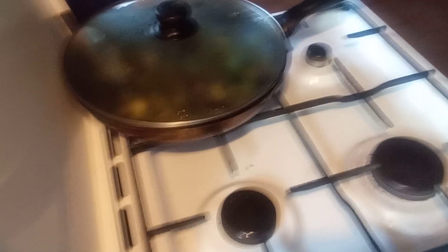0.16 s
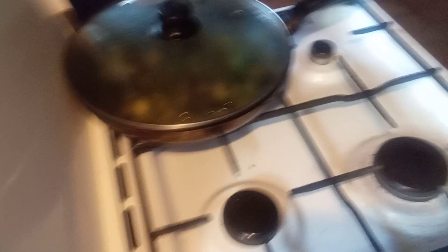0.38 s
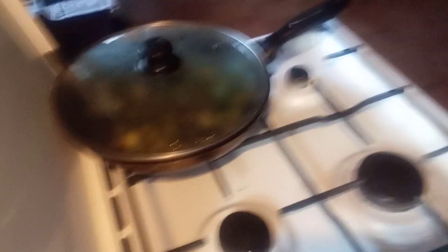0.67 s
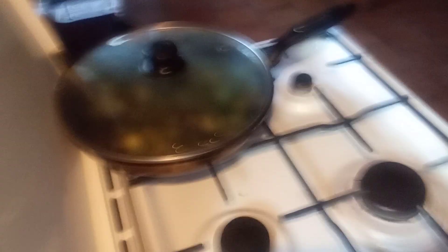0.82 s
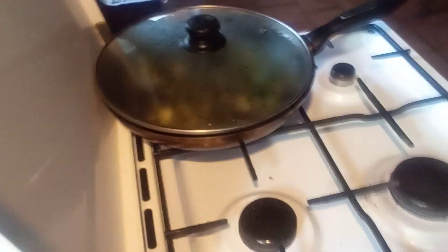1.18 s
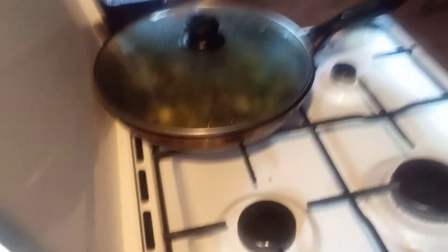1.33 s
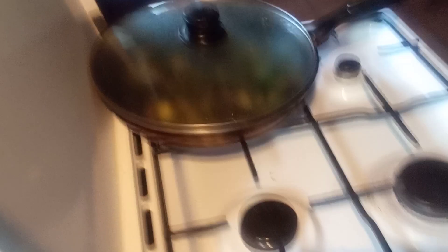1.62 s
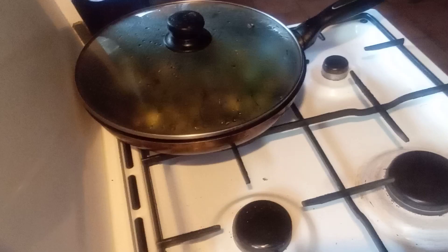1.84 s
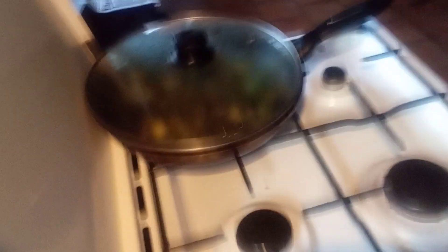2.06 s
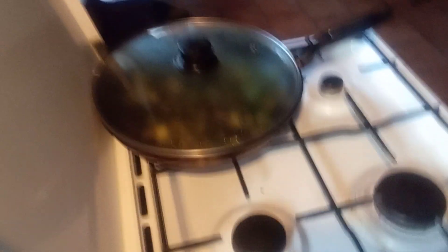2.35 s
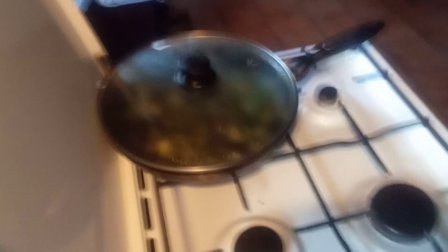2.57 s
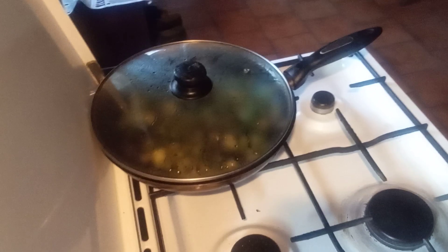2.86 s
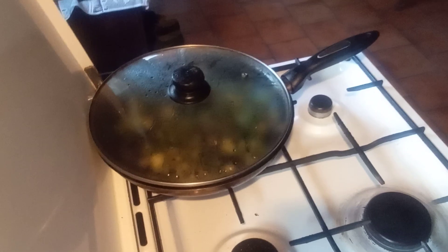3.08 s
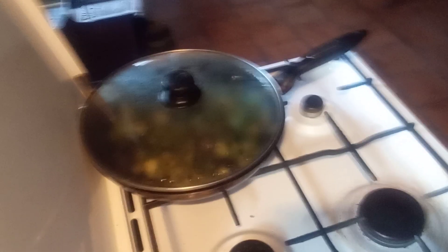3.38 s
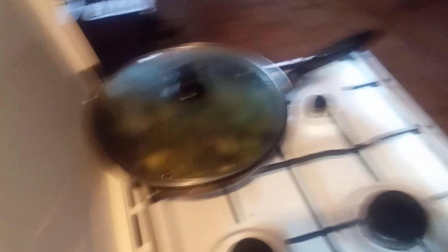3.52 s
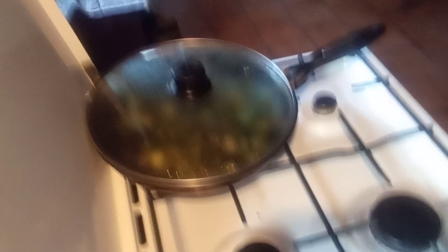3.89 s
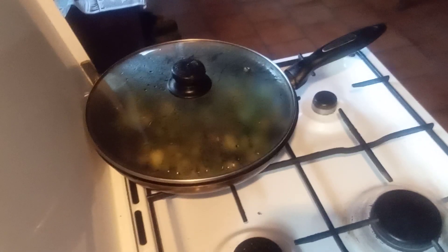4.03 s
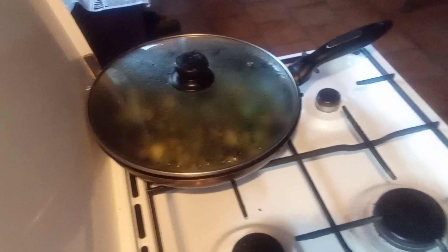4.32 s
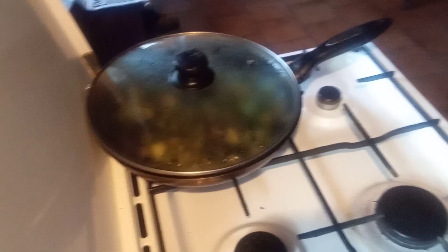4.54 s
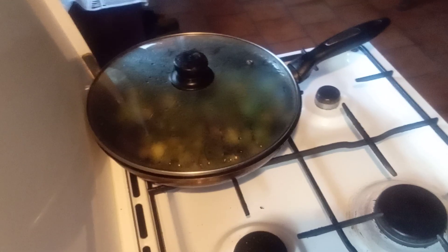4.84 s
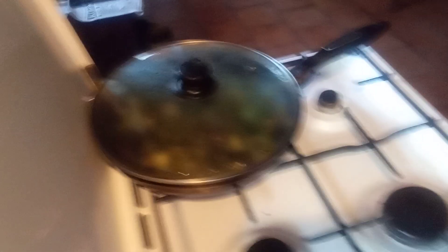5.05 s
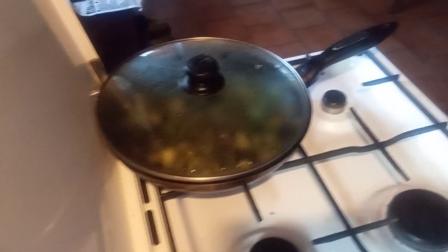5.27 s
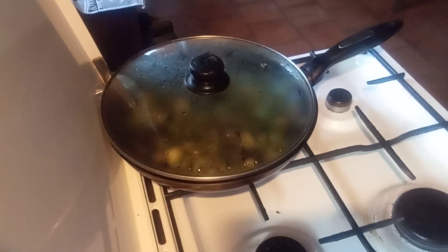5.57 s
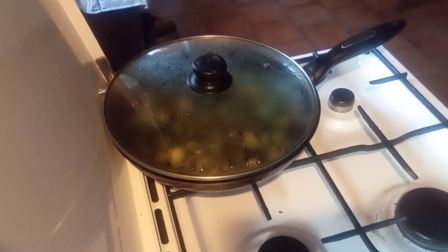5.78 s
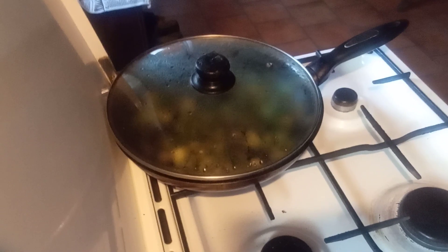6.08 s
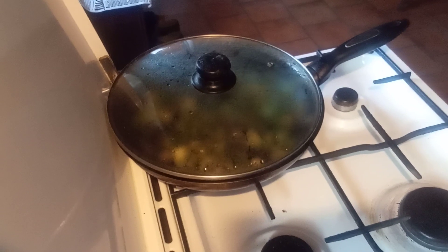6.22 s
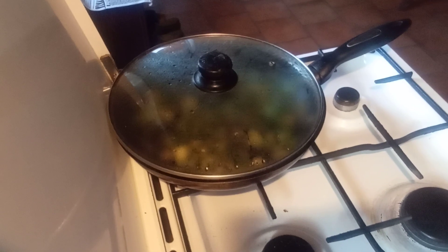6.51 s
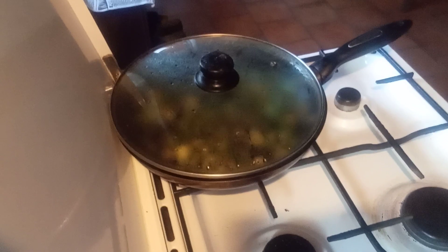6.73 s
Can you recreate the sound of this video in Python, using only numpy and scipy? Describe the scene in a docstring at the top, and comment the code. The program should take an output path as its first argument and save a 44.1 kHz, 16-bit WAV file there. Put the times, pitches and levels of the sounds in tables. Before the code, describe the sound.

A covered pan of greens in sauce fries quietly on a gas stove, heard close through a handheld phone. Fine, bright, uneven sizzle and softer hiss continue from start to end, over hollow low-level bubbling and a faint steady burner rush. From 0 to 1.1 s fingers rub and knock the phone case, with hard hollow taps around 0.4-0.5, 0.7 and 0.9. Small sauce plops come at 1.23 and 1.43. A heavy thud and sharp crack hit together at 1.62; another thump at 1.96, then scraping and a knock at 2.3-2.4. Handling softens into light rubs from 2.8 to 4.2, while bubbles pop and fat ticks. A crisp crack at 4.68 leads to a clicky tap at 4.83 and a palm brushing away past 5. Spits cluster around 5.85-6.2; faint dull bumps and rubbing return at 6.75.

```python
"""Fat sizzles and spits around greens in sauce under a glass lid on a gas stove: bursts gate coloured noise.
Bubbles ring the hollow under the lid; thick sauce plops as short decaying sines.
The burner is a steady low noise. The pan is heard from close by through a hand-held phone:
fingers rub, knock and brush its case, as noise shaped by the case's response.
Sharp cracks, from a case seam or a fat spit, are short decaying noise."""
import sys
import numpy as np
from scipy import signal
from scipy.fft import rfft, irfft, next_fast_len
from scipy.io import wavfile
from scipy.ndimage import map_coordinates

SR = 44100
rng = np.random.default_rng(int(sys.argv[2]) if len(sys.argv) > 2 else 0)


def transcribe(u):
    """Save the signal u as a 16-bit wav file named by the first command-line argument.

    u: samples, shape (n,) or (channels, n), limited to [-1, 1]; the rate is SR.
    q: integer samples, one column per channel.
    """
    v = np.clip(np.atleast_2d(u).T, -1, 1)
    q = np.round(v * 32767).astype(np.int16)
    wavfile.write(sys.argv[1], SR, q)


N = 304290


def amp(db):
    """Decibels to gain."""
    return 10 ** (np.asarray(db) / 20)


def unit(x):
    """Scale to rms 1."""
    return x / np.sqrt(np.mean(x ** 2) + 1e-20)


def wobble(knots_hz):
    """Smooth random curve through normal-distributed knots."""
    knots = rng.standard_normal(int(N * knots_hz / SR) + 4)
    return map_coordinates(knots, [np.arange(N) * knots_hz / SR])


def response(colour, tilt=None, modes=(), size=8192):
    """Minimum-phase stereo impulse response of a colour table, plus a (hz, db) tilt and resonances."""
    grid_hz = np.fft.rfftfreq(size, 1 / SR) + 1
    hz, *sides_db = np.transpose(colour)
    db = np.array([np.interp(np.log(grid_hz), np.log(hz), side) for side in sides_db])
    db = db + sum(lift_db / (1 + (2 * (grid_hz - centre_hz) / width_hz) ** 2)
                  for centre_hz, width_hz, lift_db in modes)
    if tilt is not None:
        tilt_hz, tilt_db = np.transpose(tilt)
        db = db + np.interp(np.log(grid_hz), np.log(tilt_hz), tilt_db)
    # fold the cepstrum onto positive time: causal, minimum phase
    cepstrum = irfft(np.log(amp(db)))
    cepstrum[:, 1:size // 2] *= 2
    cepstrum[:, size // 2 + 1:] = 0
    return irfft(np.exp(rfft(cepstrum)))


def through(x, impulse):
    """Convolve a force with a stereo impulse response of unit mean energy per side."""
    impulse = impulse / np.sqrt(np.sum(impulse ** 2) / 2)
    return signal.fftconvolve(np.atleast_2d(x), impulse, axes=1)[:, :N]


def noise(alike=0):
    """Two white noises; alike is the power share they have in common."""
    share = np.clip(alike, 0, 1)
    common = np.sqrt(share) * rng.standard_normal(N)
    return common + np.sqrt(1 - share) * rng.standard_normal((2, N))


def bursts(rate_hz, spread_db, t60_s):
    """Envelope of rms 1: random bursts of uneven size, each decaying exponentially."""
    onsets = rng.random(N) < rate_hz / SR
    size_db = spread_db * np.minimum(rng.standard_normal(N), 2.6)
    energy = onsets * amp(size_db) ** 2
    decay_per_sample = amp(-60 / (t60_s * SR)) ** 2
    return unit(np.sqrt(signal.lfilter([1], [1, -decay_per_sample], energy)))


def decay(start_s, t60_s, attack_s):
    """Envelope that rises at start_s and dies away."""
    t = np.maximum(np.arange(N) / SR - start_s, 0)
    return (1 - np.exp(-t / attack_s)) * np.exp(-np.minimum(np.log(1000) * t / t60_s, 20))


def add(track, start_s, sound):
    """Mix a short sound in at start_s."""
    part = track[..., round(start_s * SR):][..., :sound.shape[-1]]
    part += sound[..., :part.shape[-1]]


# burner and room colour: hz [Hz], left_db [dB], right_db [dB]
ROOM_COLOUR = [(25, -31, -25), (50, -30, -21), (87.5, -1, -7), (153, -17.5, -16), (246.5, 6.5, 2.5),
               (336, -1.5, -1), (394, -12.5, -20.5), (650, -8, -8), (870, -8.5, -15), (1360, -33, -29),
               (4050, -42, -10.5)]


def kitchen():
    """The burner's low, nearly even rush, coloured by the room."""
    flame = amp(-61.5 + 0.19 * wobble(2.9))
    return flame * through(noise(alike=1.0), response(ROOM_COLOUR))


# case resonances: centre_hz [Hz], width_hz [Hz], lift_db [dB]
CASE_MODES = [(294, 50, 4), (431, 35, 4), (886, 55, 6), (1165, 50, 5), (1356, 60, 4), (1815, 50, 4),
              (1982, 80, 4), (2292, 50, 4), (2753, 45, 4), (2887, 45, 4), (3150, 50, 3), (3226, 40, 3.5),
              (3374, 45, 4), (3868, 50, 3), (4270, 70, 4)]


def case(colour, tilt=None):
    """Phone case response; its bending waves reach the left microphone later."""
    left, right = response(colour, tilt, CASE_MODES)
    lag = round(.0007 * SR)
    return np.array([np.pad(left, (lag, 0))[:len(left)], right])


def pressure(full_s, rise_s, hold_s, release_s):
    """Stroke envelope: skin presses on, slides, lets go; 20 dB per rise_s or release_s."""
    t = np.arange(N) / SR - full_s
    away = np.maximum(-t / rise_s, 0) + np.maximum((t - hold_s) / release_s, 0)
    return amp(-20 * np.minimum(away, 10))


# finger strokes: full_s (full pressure), rise_s, hold_s, release_s [s], flex_db, hum_db, rasp_db [dB]
STROKES = [(0.111, 0.058, 0.0057, 0.055, -47.5, -39.5, -42.5), (0.205, .03, 0.016, 0.045, -70, -54, -51),
           (0.356, 0.16, 0.033, .05, -72, -65, -45.5), (0.418, .04, 0.046, 0.077, -73, -32, -49),
           (0.52, 0.027, .02, .04, -59, -44, -58), (0.635, .02, .02, .06, -55.5, -61, -78),
           (0.725, 0.028, 0.043, .06, -51, -46, -60), (0.848, 0.092, 0.018, .03, -46.5, -33, -54),
           (0.877, 0.014, 0.024, 0.035, -41.5, -23, -57), (0.976, .06, 0.0075, 0.075, -56, -39, -39.5),
           (1.083, 0.054, 0.011, 0.086, -63, -65, -64), (1.108, 0.0087, 0.0079, 0.11, -66, -58, -45),
           (1.419, 0.1, 0.092, 0.11, -62, -58, -51.5), (1.636, 0.059, 0.037, 0.083, -49, -55, -69),
           (1.701, 0.054, 0.031, 0.18, -65, -78, -48.5), (1.939, 0.053, 0.046, 0.08, -46, -39.5, -39),
           (2.04, 0.047, 0.084, .12, -71, -58, -38.5), (2.17, 0.048, 0.039, 0.09, -55, -51, -45.5),
           (2.249, 0.04, 0.012, 0.037, -70, -40, -41.5), (2.313, .006, 0.0076, 0.0086, -51, -29, -33),
           (2.331, 0.035, 0.067, 0.054, -46, -29.5, -25.5), (2.455, 0.057, 0.039, 0.027, -50, -38, -37),
           (2.8, 0.025, .025, 0.061, -74, -55.5, -56), (3.225, .11, 0.042, 0.021, -53, -40, -43.5),
           (3.416, .07, .14, 0.036, -60, -47.5, -49.5), (3.707, 0.072, 0.18, 0.065, -66, -54.5, -51),
           (4.028, .04, 0.16, .2, -79, -53.5, -58.5), (4.71, .06, 0.036, 0.045, -75, -56, -68),
           (4.8, 0.011, 0.016, 0.22, -47.5, -46, -62), (4.962, 0.11, .018, .08, -44.5, -46, -60),
           (5.055, 0.034, .01, 0.59, -55, -49.5, -53), (5.468, .02, 0.0058, 0.028, -60, -78, -68),
           (5.944, .06, 0.02, .04, -66, -67, -70), (6.745, 0.027, 0.094, 0.11, -47, -51, -66)]
# case colour when rubbed or tapped, rasped, flexed, brushed by the palm: hz [Hz], left_db, right_db [dB]
HUM_COLOUR = [(40.4, -41, -55), (93, -29, -21), (179, -28.5, -6.5), (259, -7, 2), (331, 1, -7),
              (446, -11, -27.5), (696, -20, -21), (810, -18.5, -3.5), (1060, -20, -8), (1510, -48, -19),
              (1930, -38, -20.5), (3540, -52, -44.5), (5000, -48, -51), (11900, -69, -78)]
RASP_COLOUR = [(120, -27, -40), (231, -18.5, -9), (358, 3, -3.5), (450, -18.5, -7.5), (680, -17, -22.5),
               (937, -16, 3.5), (1215, -77, -6.5), (1630, -9, -15), (2000, -14.5, -6), (2500, -17, -16.5),
               (3090, -16, -4), (4240, -19, -12), (4620, -38, -22.5), (9000, -77, -89)]
FLEX_COLOUR = [(25, -53, -32.5), (49.6, -37, -19), (86, -11.5, 0.5), (152, -4.5, -3), (216, -18, -6.5),
               (496, -47, -26)]
PALM_COLOUR = [(100, -7, -4), (374, 14, 11), (680, 2, 0), (1210, -1, 11), (2100, 10, 10.5), (2560, -14, 4),
               (3140, 8.5, 7.5), (4830, -30, 4), (9000, -66, -49)]
# palm brushing away: rise_s, hold_s, release_s [s], level_db [dB]
PALM_SWEEP = (0.14, -0.06, 0.68, -39.5)
PALM_LANDS_S = 4.812


def rubbing():
    """Skin sticks and slips on the case, which flexes, hums and rasps; a palm brushes away."""
    slips = bursts(rate_hz=760, spread_db=0.64, t60_s=0.029)
    flexing, humming, rasping = sum(amp(levels_db)[:, None] * pressure(full_s, rise_s, hold_s, release_s)
                                    for full_s, rise_s, hold_s, release_s, *levels_db in STROKES)
    hum = through(humming * slips * noise(alike=1.0), case(HUM_COLOUR))
    flex = through(flexing * noise(alike=0.49), case(FLEX_COLOUR))
    rasp = through(rasping * slips * noise(alike=0.23), case(RASP_COLOUR))
    *timing_s, palm_db = PALM_SWEEP
    brushing = amp(palm_db) * pressure(PALM_LANDS_S, *timing_s)
    palm = through(brushing * slips * noise(alike=0.093), case(PALM_COLOUR))
    return hum + flex + rasp + palm


# finger taps, relative levels: start_s [s], thud_db [dB], ring_db [dB], snap_db [dB]
TAPS = [(0.418, -45, -28, -45), (0.447, -34, -30, -67), (0.522, -29, -18, -27.5), (0.725, -31, -24.5, -41),
        (0.879, -30.5, -33.5, -40), (1.6172, -20, -31, -58), (1.961, -21.5, -37, -32.5),
        (2.338, -26, -25, -49), (2.402, -45, -39, -31), (3.272, -50, -65, -60), (4.8292, -41.5, -29.5, -22),
        (4.966, -38.5, -49, -54), (5.063, -43.5, -56, -53), (6.736, -40.5, -93, -63),
        (6.775, -43.5, -69, -65), (6.812, -36.5, -47.5, -72)]


def taps():
    """A soft fingertip thuds; harder contact also rings the stiff parts; each chatters briefly."""
    out = np.zeros((2, N))
    t = np.arange(SR // 25) / SR
    for start_s, thud_db, ring_db, snap_db in TAPS:
        hardness = [(120, thud_db + 9), (330, thud_db), (800, ring_db), (1400, ring_db),
                    (3000, snap_db + 20.5), (6000, snap_db + 11.5)]
        force = .045 * amp(-60 * t / .028) * rng.standard_normal(len(t))  # chatter
        force[0] = 1  # impact
        knock = signal.fftconvolve(force[None], case(HUM_COLOUR, hardness), axes=1)
        add(out, start_s, amp(46.0) * knock)
    return out


# sharp cracks and pops, a case seam or a fat spit: start_s [s], level_db [dB], t60_s [s]
CRACKS = [(1.6222, -13.5, .011), (4.6782, -20, .011)]
# crack colour: hz [Hz], left_db [dB], right_db [dB]
CRACK_COLOUR = [(200, -45, -35), (1000, -22, -12), (3500, -14, 0), (6300, -14, 1), (8000, -30, -9),
                (10300, -28, -4), (12500, -30, -11), (15000, -22, -8)]


def cracks():
    """Sharp cracks and pops, from a case seam or a fat spit: short decaying noise."""
    snaps = sum(amp(level_db) * decay(start_s, t60_s, attack_s=.0006)
                for start_s, level_db, t60_s in CRACKS)
    return through(snaps * noise(), response(CRACK_COLOUR))


# sauce plops, relative levels: start_s [s], level_db [dB], pitch_hz [Hz], t60_s [s]
PLOPS = [(1.2345, -29, 895, 0.011), (1.2365, -38, 530, 0.031), (1.2381, -35, 344, 0.062),
         (1.426, -31.5, 402, 0.024), (3.692, -41, 1240, 0.03), (3.695, -51, 432, 0.029)]


def plops():
    """Large slow bubbles in thick sauce open with a short, hollow note."""
    t = np.arange(N) / SR
    notes = sum(amp(level_db) * decay(start_s, t60_s, attack_s=0.0011)
                * np.sin(2 * np.pi * pitch_hz * (t - start_s))
                for start_s, level_db, pitch_hz, t60_s in PLOPS)
    left_right_db = [[5], [3]]
    return amp(left_right_db) * notes


# hollow under the lid: centre_hz [Hz], width_hz [Hz], level_db [dB]
LID = [(1009, 93, -2), (1614, 123, -9), (2222, 62, -14), (2753, 145, -12.5)]
# big bubbles, relative levels: start_s [s], level_db [dB]
BUBBLES = [(2.675, -40.5), (2.841, -34.5), (2.904, -42), (3.691, -41), (3.862, -37), (4.015, -38),
           (5.113, -39.5), (5.553, -42), (5.96, -41), (6.222, -39.5)]


def simmer():
    """Bubbles burst all over the sauce; each lid resonance is rung by its own share of them."""
    t = np.arange(SR // 20) / SR
    big_pops = sum(amp(level_db) * decay(start_s, t60_s=0.07, attack_s=0.00028)
                   for start_s, level_db in BUBBLES)
    out = np.zeros((2, N))
    for centre_hz, width_hz, level_db in LID:
        boiling = amp(1.1 * wobble(3.5)) * bursts(rate_hz=400, spread_db=2.5, t60_s=.07)
        # builds up, then leaks out at the rim
        ring = t * np.exp(-np.pi * width_hz * t) * np.cos(2 * np.pi * centre_hz * t)
        popping = np.hypot(amp(-52) * boiling, big_pops) * noise()
        out += amp(level_db) * through(popping, np.array([ring, amp(-1.5) * ring]))
    return out


# spitting drops of fat, relative levels: start_s [s], level_db [dB], t60_s [s]
SPITS = [(0.073, -32, .02), (0.142, -32, .015), (1.0475, -24, .008), (1.657, -30, .01), (2.347, -27, .009),
         (2.634, -35, .02), (2.678, -33, .06), (2.847, -34, .03), (3.069, -24, .008), (3.285, -31, .012),
         (3.953, -30, .01), (4.179, -29, .009), (4.547, -34, .02), (5.001, -27, .009), (5.8505, -22, .007),
         (5.955, -31, .018), (5.964, -33, .04), (6.026, -31, .028), (6.076, -34, .05), (6.153, -28, .025),
         (6.179, -22, .009), (6.643, -28, .012)]
# fizz and hiss colours, shared with sizzle: hz [Hz], left_db [dB], right_db [dB]
FIZZ_COLOUR = [(4830, -38, -54), (8600, -34, -11.5), (9450, -45, -5), (10520, -22, 1), (12450, -37, 3),
               (12200, -9, 3), (13500, -44, -4), (15440, -9, -0.5), (16460, -4, -10)]
HISS_COLOUR = [(626, -29, -18.5), (1400, -7, -12), (1960, -6.5, -3), (2570, -13, -5), (3030, -9.5, -17),
               (3240, -3, -1.5), (4800, -0.5, 1.5), (6660, -1.5, 2.5), (6760, -15, 0), (8200, -20, -7.5),
               (11500, -45, -2), (16500, -48, -65)]


def spits():
    """Single drops of fat burst into steam, as a tick or a short sputter."""
    steam = sum(amp(level_db) * decay(start_s, t60_s, attack_s=0.00035)
                for start_s, level_db, t60_s in SPITS)
    bright = amp(1) * through(steam * noise(), response(FIZZ_COLOUR))
    return bright + amp(-11) * through(steam * noise(), response(HISS_COLOUR))


# frying strength, relative levels: time_s [s], fizz_db (at the rim) [dB], hiss_db [dB]
FRYING = [(0.0, -49.5, -54.26), (0.08, -45.32, -55), (0.19, -51.74, -57), (0.35, -46.5, -53),
          (0.54, -50.29, -57), (0.7, -47.5, -55.52), (1.05, -47, -56), (1.35, -49, -56), (1.9, -48.5, -54),
          (2.56, -50.5, -55), (2.72, -46.34, -54), (3.35, -50, -56), (4.1, -48, -55.5), (4.45, -50, -57),
          (5.65, -46.5, -54.5), (6.15, -48.5, -56.5), (6.3, -48.5, -55.28), (6.9, -49, -55)]
# duller, then brighter bursts: share_db [dB], tilt as (hz [Hz], gain_db [dB]) points
FIZZ_TILTS = [(-0.3, [(12500, -3), (14000, -14.5)]), (-0.1, [(11500, -16), (14000, 11)])]


def sizzle():
    """Water flashes to steam in hot fat: hiss plus two layers of tiny bursts, one duller, one brighter."""
    times_s, *levels_db = np.transpose(FRYING)
    fizz_db, hiss_db = (np.interp(np.arange(N) / SR, times_s, db) for db in levels_db)
    clumps = amp(0.7 * wobble(70) + 0.6 * wobble(22))
    frying = bursts(rate_hz=1500, spread_db=5, t60_s=.01)
    hiss = amp(hiss_db) * clumps * np.hypot(amp(2.5) * frying, amp(3.5))  # bursts over a steady part
    out = through(hiss * noise(), response(HISS_COLOUR))
    surges = amp(fizz_db + 1.1 * wobble(26))
    for share_db, tilt in FIZZ_TILTS:
        crackle = bursts(rate_hz=1400, spread_db=6, t60_s=.007)
        fizz = surges * clumps * np.hypot(crackle, amp(-1.5))
        out += amp(share_db) * through(fizz * noise(), response(FIZZ_COLOUR, tilt))
    return out


def scene():
    """The kitchen, the hand on the phone, sharp cracks and the pan."""
    hand = rubbing() + taps()
    pan = plops() + simmer() + spits() + sizzle()
    return kitchen() + hand + cracks() + pan


def record(dry):
    """The phone keeps nothing above its band limit."""
    top_hz = 15700
    size = next_fast_len(N + SR // 2)
    passband = np.fft.rfftfreq(size, 1 / SR) < top_hz
    return irfft(rfft(dry, size) * passband, size)[:, :N]


dry = scene()
out = record(dry)
transcribe(out)
```